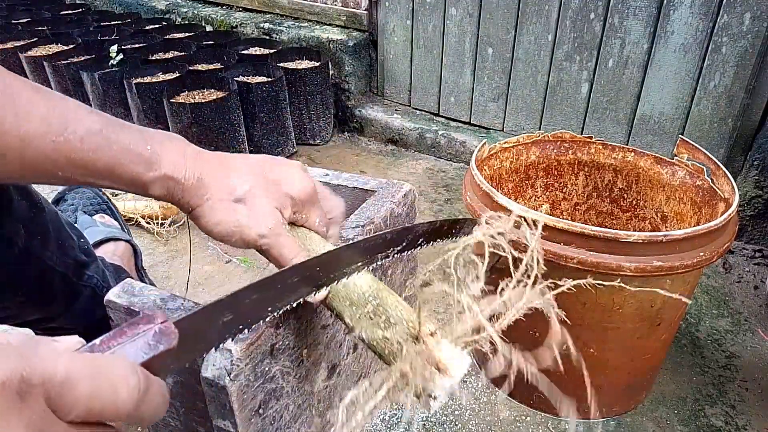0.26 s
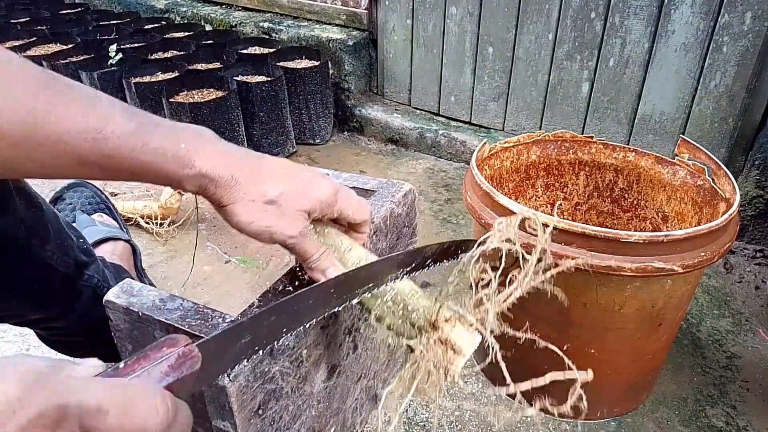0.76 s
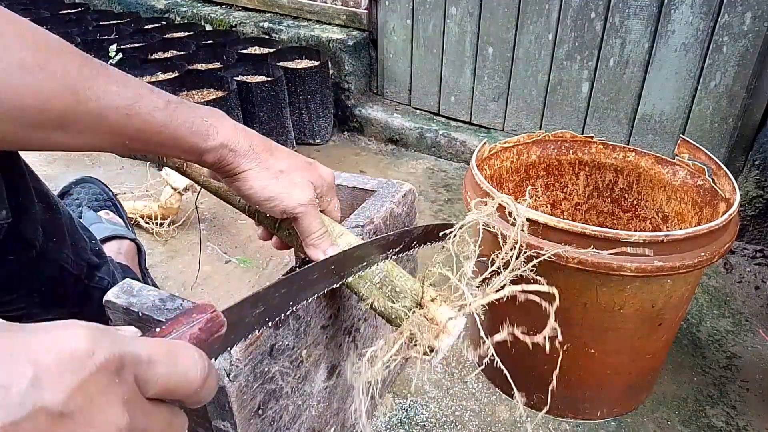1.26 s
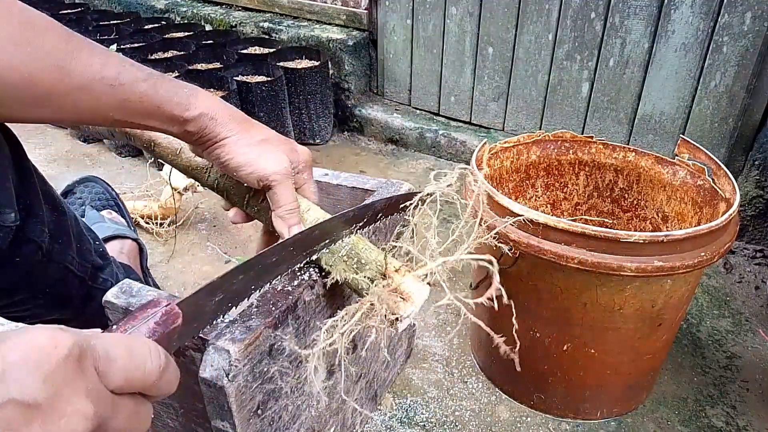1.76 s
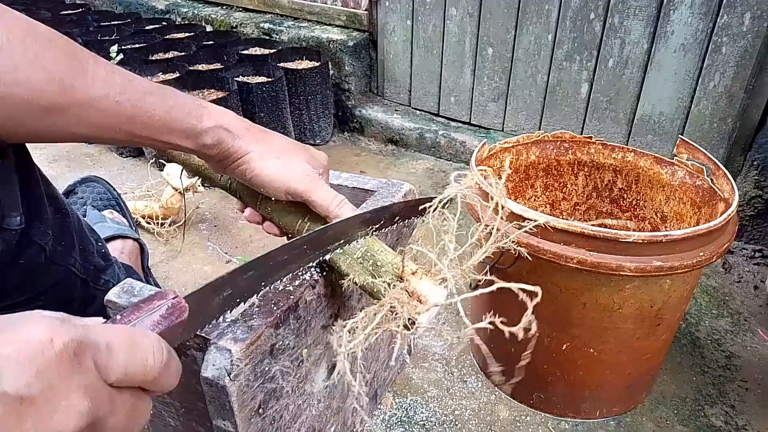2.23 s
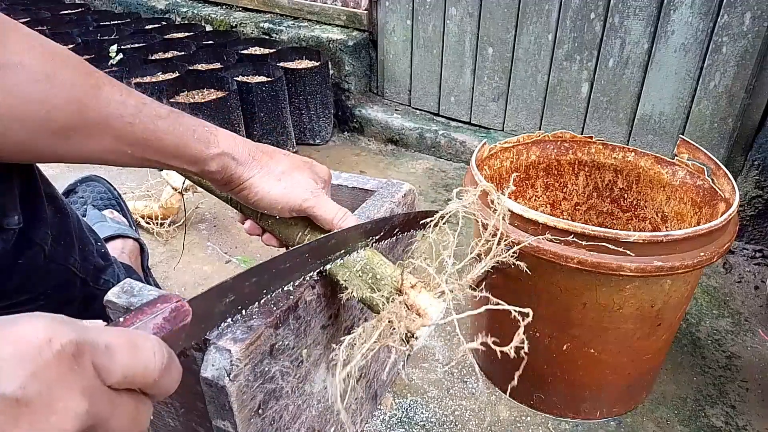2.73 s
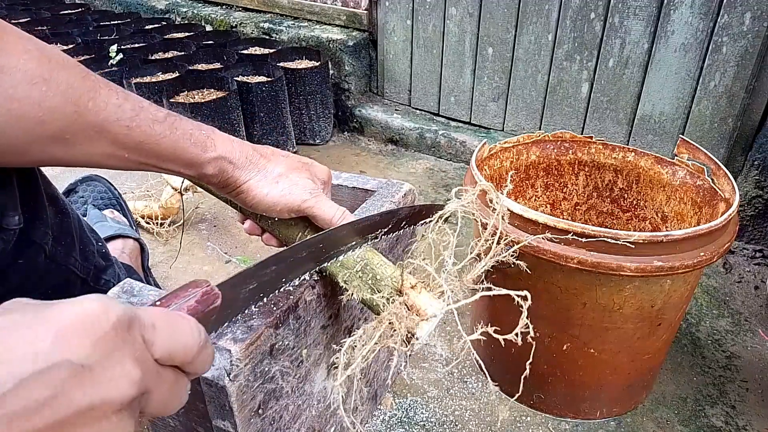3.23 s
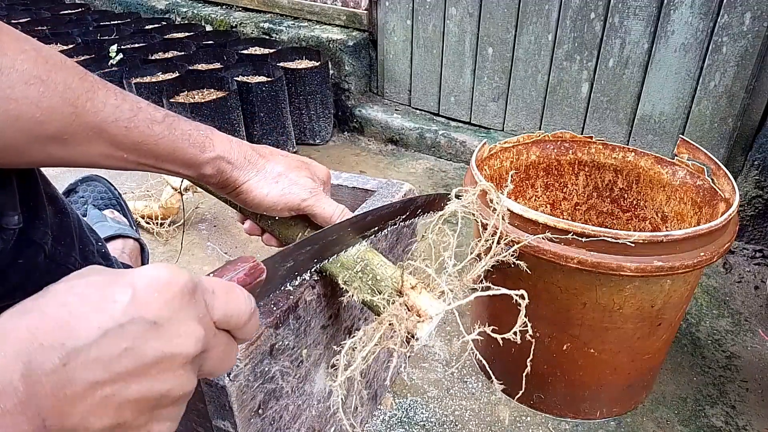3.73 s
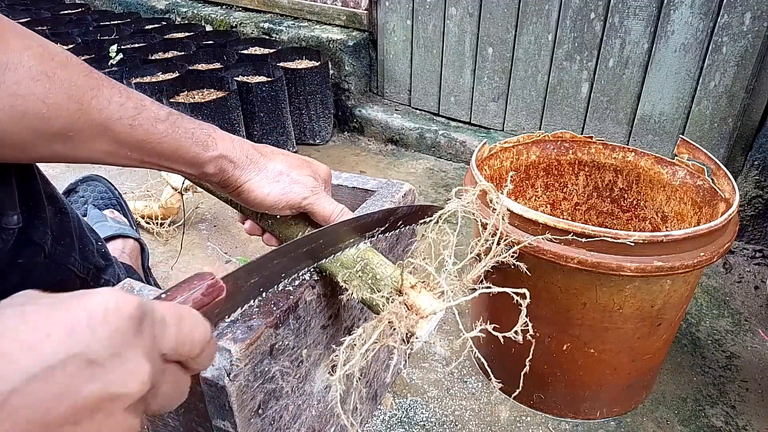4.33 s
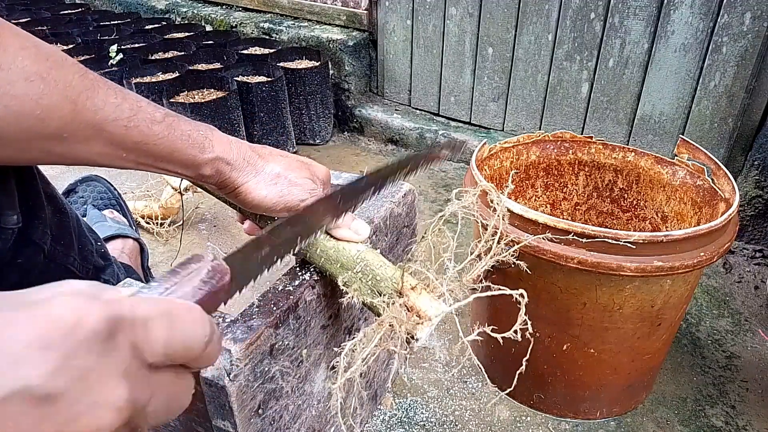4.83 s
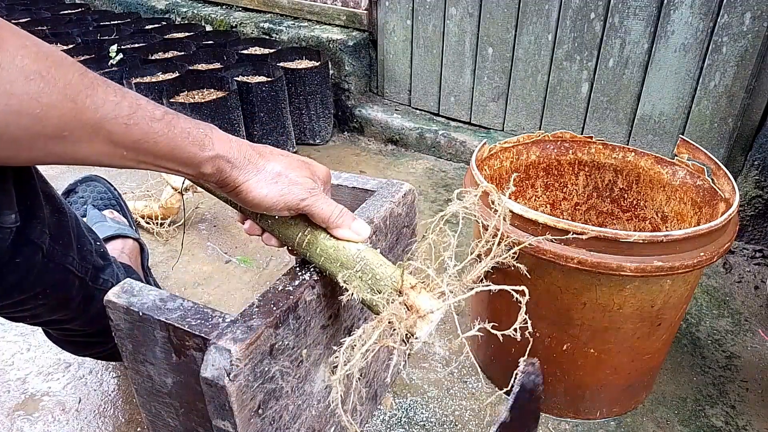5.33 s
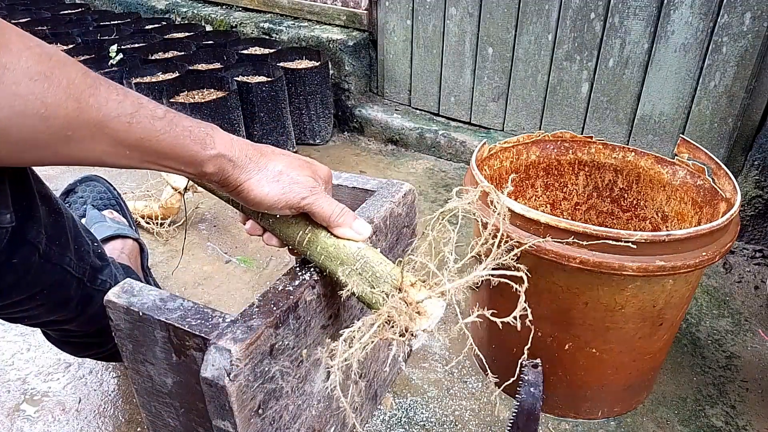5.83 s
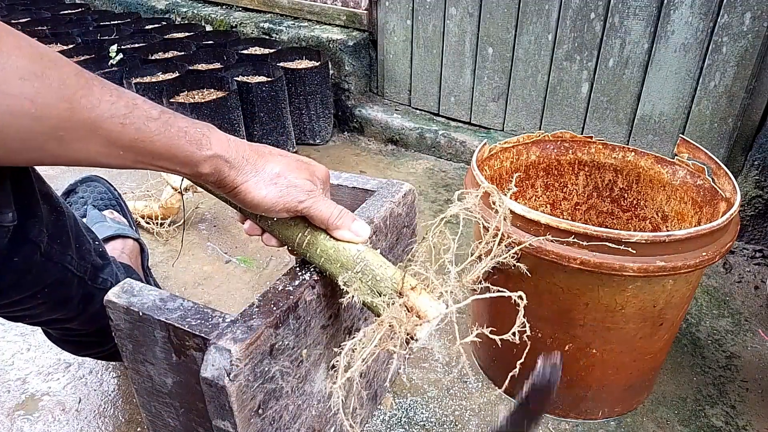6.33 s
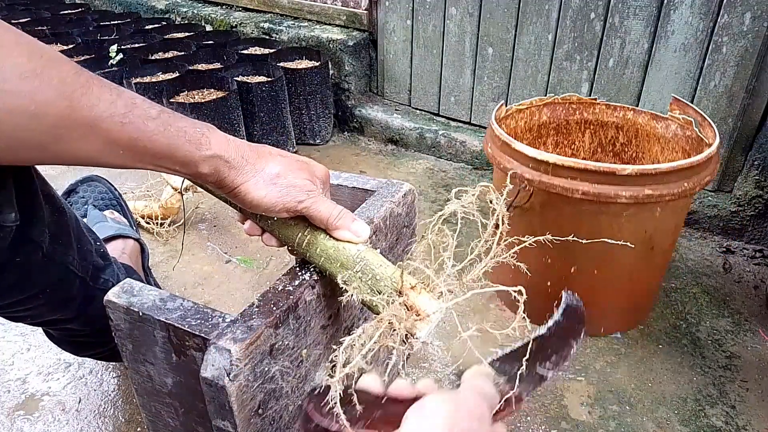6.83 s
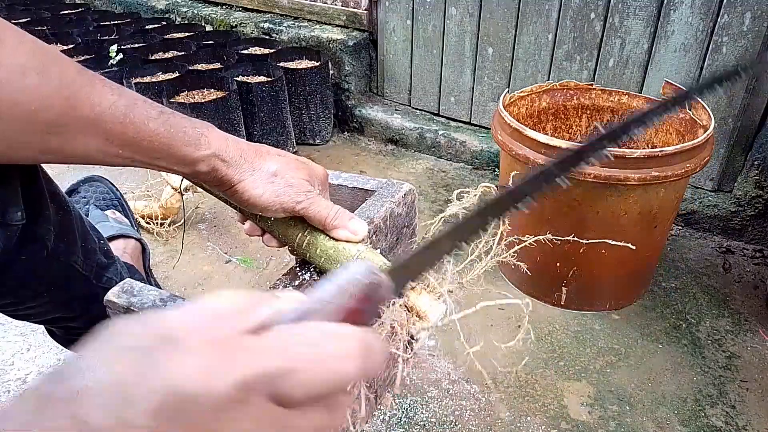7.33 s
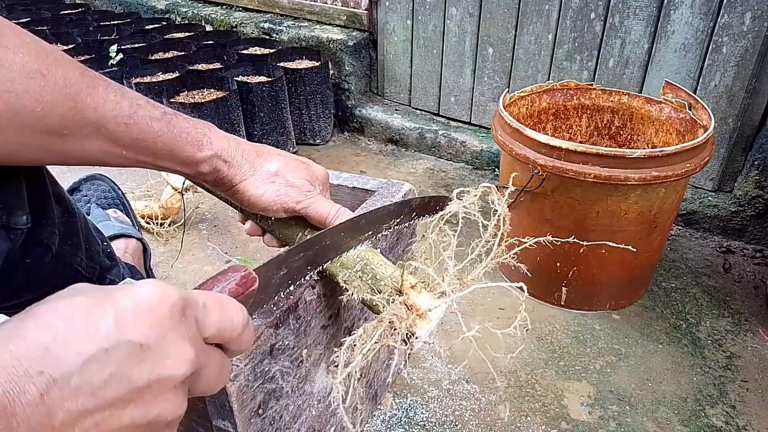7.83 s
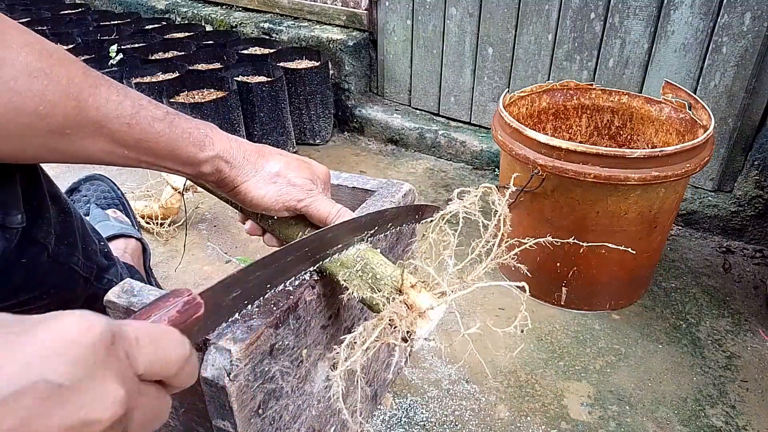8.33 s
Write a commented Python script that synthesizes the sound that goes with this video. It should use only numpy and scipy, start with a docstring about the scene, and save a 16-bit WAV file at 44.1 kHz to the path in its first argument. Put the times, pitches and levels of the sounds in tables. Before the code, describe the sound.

In a quiet outdoor yard with gliding bird whistles and a steady high insect trill, a stem rubs softly on a wooden crate and a curved saw rasps its bark in a few light strokes with small ticks. The saw is set down with a hard clack, a plastic bucket judders loudly over gritty concrete, and brief sawing resumes. Close microphone, faint reflections from a fence.

```python
"""Rubs of a green stem on a wooden crate, then a curved pruning saw rasps its bark in a few light strokes.
The saw is put down with a clack; a plastic bucket is shoved over gritty concrete; the sawing resumes.
Throughout: yard murmur, a steady insect trill and gliding bird notes; small ticks fall between.
Contacts are noise grains and bursts through spectra and resonances; birds are swept sines.
Table levels come before each source's trims, filters and echoes."""
import sys
import numpy as np
from scipy import signal
from scipy.io import wavfile
from scipy.ndimage import map_coordinates

SR = 44100
rng = np.random.default_rng(int(sys.argv[2]) if len(sys.argv) > 2 else 0)


def generate_wav(signal):
    """Clip the signal to [-1, 1] and save it as 16-bit WAV at the path in sys.argv[1]."""
    frames = np.transpose(np.atleast_2d(signal))
    scaled = np.clip(frames, -1, 1) * 32767
    pcm = np.round(scaled).astype(np.int16)
    wavfile.write(sys.argv[1], SR, pcm)


N = 377937
TIME = np.arange(N) / SR


def gain_of(db):
    """Decibels to amplitude."""
    return 10 ** (np.asarray(db) / 20)


def evened(x):
    """Scales to an rms of one."""
    return x / np.sqrt(np.mean(x ** 2) + 1e-20)


def peaked(x):
    """Scales to a peak of one."""
    return x / abs(x).max()


def add(mix, start_s, sound):
    """Mixes a sound in at a time, cut off at the end of the mix."""
    part = mix[round(start_s * SR):][:len(sound)]
    part += sound[:len(part)]


def through(x, response):
    """Passes a signal through an impulse response."""
    return signal.oaconvolve(x, response)[:len(x)]


def click(points, size=4096):
    """Minimum-phase impulse response of a spectrum given as (f/Hz, level/dB)."""
    hz, db = np.transpose(points)
    f = abs(np.fft.fftfreq(size, 1 / SR))
    level_db = np.interp(np.log(f + 1), np.log(hz), db)
    log_gain = np.log(gain_of(level_db))
    spectrum = np.exp(signal.hilbert(log_gain).conj())
    return np.fft.ifft(spectrum).real[:size // 2]


def ring(peaks, softness_hz=5500):
    """Impulse response of resonances (f/Hz, width/Hz, level/dB), excited by a slightly soft contact."""
    t = TIME[:SR // 4]
    modes = np.zeros(len(t))
    for hz, width_hz, db in peaks:
        decay = np.exp(-np.pi * width_hz * t)
        modes += gain_of(db) * width_hz * decay * np.cos(2 * np.pi * hz * t)
    soft = signal.butter(3, min(softness_hz, SR / 4), fs=SR, output="sos")
    return signal.sosfilt(soft, modes)


def crack(points, t60_s, rattle, rim_hz=2300, rim_share=0.33):
    """A contact that rings the edge for a few cycles, plus a dense, quickly dying rattle; peak one."""
    t = TIME[:SR // 5]
    blow = rng.standard_normal(len(t)) * gain_of(-60 * t / t60_s)
    blow *= rattle / np.linalg.norm(blow)
    rim = np.exp(-t / .0016) * np.sin(2 * np.pi * rim_hz * t)
    blow += rim_share * rim / np.linalg.norm(rim)
    blow[0] += .55  # first contact
    return peaked(through(blow, click(points)))


def wander(per_s):
    """Smooth chance with an rms of one."""
    knots = rng.standard_normal(4096)
    return evened(map_coordinates(knots, [TIME * per_s], order=3, mode="wrap"))


def grains(per_s, spread_db):
    """Tiny fractures at random moments, a few much larger than the rest."""
    sizes = gain_of(spread_db * np.minimum(rng.exponential(1, N), 4))
    signs = rng.choice([-1, 1], N)
    falls = rng.random(N) < per_s / SR
    return evened(sizes * signs * falls)


def echoes(x, t60_s):
    """Scattered reflections that die away, their treble softened."""
    t = TIME[:SR]
    falls = (rng.random(SR) < 2000 / SR) * (t > .006)
    taps = rng.standard_normal(SR) * falls * gain_of(-60 * t / t60_s)
    taps = signal.lfilter([1], [1, -.4], taps)
    return through(x, taps / np.linalg.norm(taps))


def resonate(x, hz, width_hz):
    """A resonance of gain one whose centre follows the curve hz."""
    turn = np.exp(2j * np.pi * np.cumsum(hz) / SR)
    r = np.exp(-np.pi * width_hz / SR)
    base = signal.lfilter([1 - r], [1, -r], x / turn + 1e-18)
    return 2 * (turn * base).real


def travelling(x, per_s, t60_s, count=4):
    """A moving contact point: it excites one dense set of plate modes after another."""
    t, out = TIME[:SR // 10], np.zeros(N)
    for k in range(count):
        modes = rng.standard_normal(len(t)) * gain_of(-60 * t / t60_s)
        distance = abs((TIME * per_s + k) % count - count / 2)
        nearness = np.cos(np.pi / 2 * np.minimum(distance, 1))
        out += nearness * evened(through(x, modes))
    return evened(out)


def low_cut(x, hz):
    """Small bodies radiate little below their lowest mode."""
    return signal.sosfilt(signal.butter(5, hz, "high", fs=SR, output="sos"), x)


BITE_CURVE = 1.6  # >1: the swell rises ever more slowly


def push(start_s, length_s, db, swell_db, attack_s, t60_s):
    """Gain of one push: a quick attack, a swell that levels off at db, and a release."""
    t = np.maximum(TIME - start_s, 0)
    still_to_rise = np.maximum(1 - t / length_s, 0) ** BITE_CURVE
    release_db = 60 * np.maximum(t - length_s, 0) / t60_s
    return np.minimum(t / attack_s, 1) * gain_of(db - swell_db * still_to_rise - release_db)


def bell(middle_s, half_length_s):
    """Gain that swells and fades evenly around a moment."""
    return np.exp(-((TIME - middle_s) / half_length_s) ** 2)


# murmur spectrum: f/Hz, level/dB
YARD_SPECTRUM = [(15, -46), (25, -18.5), (75, -1.5), (115, -1.5), (155, -17.5), (218, -2), (344, -0.5),
                 (518, -7.5), (567, -8.5), (1290, -11), (2380, -10.5), (2550, -9.5), (3210, -15),
                 (3850, -14.5), (5800, -30.5), (7540, -67), (12800, -120)]
# murmur level curve: t/s, level/dB
YARD_LEVEL = [(0, -60), (1.7, -65), (3.6, -65), (4.2, -60), (8.57, -61.5)]


def yard(air_db=2.5):
    """Distant outdoor murmur of air and traffic: shaped noise with a slowly wandering level."""
    air = evened(through(rng.standard_normal(N), click(YARD_SPECTRUM, size=16384)))
    level_db = np.interp(TIME, *np.transpose(YARD_LEVEL))
    swell_db = .4 * wander(7)
    return air * gain_of(air_db + level_db + swell_db)


# insect spectrum: f/Hz, level/dB
INSECT_SPECTRUM = [(5800, -21.5), (6550, -7), (7000, -4), (7400, -1), (7800, -19.5), (8400, -18.5),
                   (9100, -12), (10300, -20.5), (11500, -33.5), (12600, -31), (14600, -18.5), (15600, -18)]


def insects(insect_db=-65, pulses_per_s=77.8):
    """A steady high trill of throbbing noise, its pulses grouped in fours."""
    turns = pulses_per_s * TIME + .1 * wander(3)
    throb = 1 + .24 * np.sin(2 * np.pi * turns) + .2 * np.sin(np.pi * turns / 2)
    hiss = evened(through(rng.standard_normal(N), click(INSECT_SPECTRUM)))
    return gain_of(insect_db) * throb * hiss


def note(length, hz, glide, db, arch, flutter):
    """One bird note: a slightly arched glide with a fluttering pitch; shares of hz, length in s."""
    u = np.linspace(-1, 1, round(length * SR))
    knots = rng.standard_normal(512)
    shake = evened(map_coordinates(knots, [TIME[:len(u)] * 600], order=3, mode="wrap"))
    pitch_hz = hz * (1 + glide * u / 2 - arch * u ** 2) * (1 + flutter * shake)
    envelope = np.sqrt(2 * (1 - u ** 2))
    return gain_of(db) * envelope * np.sin(2 * np.pi * np.cumsum(pitch_hz) / SR)


# clear whistles: t/s, length/s, f/Hz, glide [share of f], arch [share of f], level/dB
WHISTLE_NOTES = [(.023, 0.061, 3380, -0.046, -0.011, -57), (0.151, .13, 2860, -0.11, 0.014, -56),
                 (.294, 0.062, 3150, -.05, -0.034, -54.5), (1.052, 0.087, 2830, -0.11, 0.0035, -59),
                 (1.183, 0.078, 2960, 0.026, -0.0056, -55), (1.69, 0.091, 3440, -.04, 0.0089, -68),
                 (2.927, 0.17, 5490, -.06, -.04, -61), (3.335, .12, 5065, -0.0089, 0.15, -55),
                 (3.575, .068, 5370, 0.106, 0.046, -53.5), (7.53, 0.044, 3120, -0.031, -.02, -61),
                 (7.639, 0.16, 3050, -0.084, 0.015, -60)]
# hoarse, sinking calls: t/s, length/s, f/Hz, level/dB
BUZZ_NOTES = [(.434, .12, 4120, -63), (0.704, 0.077, 4200, -66), (.929, .045, 3440, -60.5),
              (1.379, 0.078, 3980, -62), (1.582, .07, 3960, -60.5), (2.036, 0.067, 3700, -64),
              (2.181, .32, 2550, -64), (6.05, 0.31, 2840, -63.5), (7.233, 0.15, 3860, -66)]
# one bird's repeated rising chip: t/s, level/dB
CHIP_TIMES = [(2.099, -52.5), (5.04, -55.5), (5.298, -54), (5.653, -53.5), (6.269, -53.5)]
# shape of that chip: length/s, f/Hz, glide, arch, flutter [shares of f]
CHIP_SHAPE = dict(length=0.0476, hz=2430, glide=0.092, arch=0.032, flutter=0.045)
# runs of quick, high notes: t/s, length/s, notes per s, f/Hz, glide [share of f], level/dB
TRILL_RUNS = [(2.654, .26, 13.4, 5710, -.14, -61), (3.765, .53, 16, 7570, 0.028, -60)]
# shares of f
WHISTLE_FLUTTER, BUZZ_GLIDE, BUZZ_FLUTTER = 0.015, -0.0403, 0.0436
TRILL_NOTE_S, TRILL_ARCH, TRILL_FLUTTER = 0.04, 0.031, 0.028


def birds(direct=0.75, echo=0.61, t60_s=0.44):
    """Thin gliding whistles, some pure and some buzzy, blurred by echoes from walls and trees."""
    out = np.zeros(N)
    for s, length_s, hz, glide, arch, db in WHISTLE_NOTES:
        add(out, s, note(length_s, hz, glide, db, arch, WHISTLE_FLUTTER))
    for s, length_s, hz, db in BUZZ_NOTES:
        add(out, s, note(length_s, hz, BUZZ_GLIDE, db, 0, BUZZ_FLUTTER))
    for s, db in CHIP_TIMES:
        add(out, s, note(db=db, **CHIP_SHAPE))
    for start_s, length_s, per_s, hz, glide, db in TRILL_RUNS:
        for s in np.arange(start_s, start_s + length_s, 1 / per_s):
            add(out, s, note(TRILL_NOTE_S, hz, glide, db, TRILL_ARCH, TRILL_FLUTTER))
    return direct * out + echo * echoes(out, t60_s)


# bucket jerks: t/s, length/s, grit end level/dB, swell up to it/dB, wall drone level/dB, favoured f/Hz
SLIDE_JERKS = [(6.641, 0.039, -29.5, -7.5, -26.5, 2140), (6.691, 0.077, -25.5, 6, -20.5, 1290),
               (6.791, 0.018, -31, 5, -23, 1400), (6.817, 0.1, -30.5, -10, -38, 1810),
               (6.921, 0.034, -22, 4, -29, 1295), (6.974, 0.051, -31.5, -5.5, -25, 950)]
SLIDE_ATTACK_S, SLIDE_T60_S, DRONE_T60_S = 0.018, .15, 0.23
SCRAPE_SAG_OCT_PER_S = 1.9


def sliding():
    """Jerks as three controls: friction, wall shaking, and a scraping pitch that sinks as a jerk slows."""
    friction, wall, pitch_hz = np.zeros(N), np.zeros(N), np.zeros(N)
    for s, length_s, db, swell_db, drone_db, hz in SLIDE_JERKS:
        friction += push(s, length_s, db, swell_db, SLIDE_ATTACK_S, SLIDE_T60_S)
        wall += push(s, length_s, drone_db, 0, SLIDE_ATTACK_S, DRONE_T60_S)
        sinking_hz = hz * 2 ** (-SCRAPE_SAG_OCT_PER_S * np.maximum(TIME - s, 0))
        pitch_hz = np.where(TIME < s, pitch_hz, sinking_hz)
    return friction, wall, pitch_hz


# base on grit, spectrum: f/Hz, level/dB
GRIT_SPECTRUM = [(200, -28), (350, 7), (540, -7), (900, 0.5), (1050, -7), (1350, -5.5), (2200, -8),
                 (3100, -6), (4200, -15.5), (7500, -40), (9500, -19.5), (12400, -42.5), (15300, -36.5)]
# shell resonances: f/Hz, width/Hz, level/dB
SHELL_MODES = [(938, 14, 12.5), (1285, 60, 7.5), (1704, 66, 0.5), (2167, 26, 1), (2710, 20, -22),
               (3040, 66, -23.5), (4430, 39, -28.5)]
# wall resonances: f/Hz, width/Hz, level/dB
WALL_MODES = [(274, 24, -10), (287.4, 22.3, 19), (371, 54, -23)]
# bucket struck, then catching and jumping: t/s, crack level/dB, wall boom level/dB
BUCKET_JOLTS = [(6.6445, -3.5, -48), (6.654, -17.5, -33), (6.7025, -28, -21), (6.7115, -34, -12),
                (6.714, -38, -9.5), (6.747, -22, -17), (6.756, -25, -27), (6.8236, -10.5, -38),
                (6.835, -27, -31), (6.889, -23, -13), (6.927, -23, -43), (6.954, -26, -33)]
# jolt spectrum: f/Hz, level/dB
JOLT_SPECTRUM = [(150, -9), (260, -5.5), (600, -12), (900, -9.5), (1400, -11), (2200, -1.5), (2700, -5.5),
                 (3280, -4.5), (3900, -18), (6000, -21), (7700, -31), (9600, -31.5), (12500, -49.5),
                 (15500, -32.5)]


def bucket(grit_db=-3, shell_db=-6, scrape_db=-7, drone_db=-4, lowest_hz=245, thud_db=-12):
    """The base judders over grit and shakes the shell; jolts crack and make the wall boom."""
    slips = grains(3000, 3) * np.exp(.25 * wander(160))
    shaking = travelling(slips, per_s=22, t60_s=.018)
    grit = evened(through(shaking, click(GRIT_SPECTRUM)))
    friction, wall, pitch_hz = sliding()
    scrape = evened(resonate(grit, pitch_hz, width_hz=360))
    shell = evened(through(slips, ring(SHELL_MODES)))
    drone = evened(through(slips, ring(WALL_MODES)))
    rough = gain_of(grit_db) * grit + gain_of(shell_db) * shell + gain_of(scrape_db) * scrape
    out = friction * rough + wall * gain_of(drone_db) * drone
    soft_push = signal.windows.hann(SR // 400)
    boom = peaked(through(ring(WALL_MODES), soft_push))
    for s, crack_db, boom_db in BUCKET_JOLTS:
        add(out, s, gain_of(crack_db) * crack(JOLT_SPECTRUM, t60_s=0.06, rattle=0.85, rim_hz=2025))
        add(out, s, gain_of(boom_db) * boom)
    return low_cut(out, lowest_hz) + gain_of(thud_db) * out  # uncut share keeps a thud


# saw landing, blade then handle: t/s, crack level/dB, ring level/dB
SAW_CLACKS = [(5.419, -9, -31), (5.437, -18, -27), (5.4394, -15.5, -13.5)]
# clack spectrum: f/Hz, level/dB
CLACK_SPECTRUM = [(130, -21), (250, -3), (500, -14), (800, 3), (1100, -6), (1500, -1.5), (2200, 1.5),
                  (3400, -7.5), (4000, -15), (4900, -15), (6100, -27), (10000, -35), (12600, -54),
                  (15000, -43)]
# handle and blade modes: f/Hz, level/dB, t60/s
HANDLE_MODES = [(637, -7, 0.17), (841, -5.5, 0.19), (946, 1.5, 0.089), (994, 4.5, 0.12), (1240, -6.5, 0.12),
                (1603, -6.5, 0.1), (1980, -15, 0.096), (2160, -15, .1), (3460, 0.5, 0.051),
                (4480, -14, 0.053)]


def saw_put_down(lowest_hz=185):
    """Quick contacts, each a crack plus decaying handle and blade modes; the last rings most."""
    out, t = np.zeros(N), TIME[:SR // 3]
    modes = np.zeros(len(t))
    for hz, db, t60_s in HANDLE_MODES:
        modes += gain_of(db - 60 * t / t60_s) * np.sin(2 * np.pi * hz * t)
    modes = peaked(modes)
    for s, crack_db, ring_db in SAW_CLACKS:
        clack = crack(CLACK_SPECTRUM, t60_s=0.081, rattle=0.94, rim_hz=2400, rim_share=0.16)
        add(out, s, gain_of(crack_db) * clack)
        add(out, s, gain_of(ring_db) * modes)
    return low_cut(out, lowest_hz)


# ticks of bark, teeth and roots: t/s, peak level/dB, dull knock relative to that peak/dB
SNAPS = [(0.639, -36, 0.5), (1.612, -39, 0.5), (1.684, -45, -5), (1.82, -47, -12), (2.919, -43.5, -25),
         (4.198, -33, -15), (4.41, -31.5, 0), (4.666, -40.5, 1), (5.909, -38.5, 5), (6.038, -40.5, 7),
         (7.174, -45, 10), (8.477, -29.5, -6.5), (8.503, -35.5, 4)]
# tick spectrum: f/Hz, level/dB
TICK_SPECTRUM = [(200, -38), (900, -13), (2500, 10.5), (4000, -0.5), (6000, -14), (10000, -9.5),
                 (15000, -44.5)]
# wood knock modes: f/Hz, width/Hz, level/dB
KNOCK_MODES = [(121, 13, -4.5), (283, 30, 7.5), (890, 110, 1), (1280, 55, 2)]
# faint snaps while the hand shifts its grip: earliest t/s, latest t/s
FIDGET_SPAN_S = (1.2, 1.65)
FIDGET_DB, FIDGET_SPREAD_DB = -50, 1.5


def ticks(tick_db=-2, faint_knock_db=-12, count=4):
    """Small snaps, each with a knock of the wood below; a few faint ones fall at random."""
    out, knock = np.zeros(N), peaked(ring(KNOCK_MODES))
    snaps = list(SNAPS)
    for _ in range(count):
        s = rng.uniform(*FIDGET_SPAN_S)
        snaps.append((s, FIDGET_DB + FIDGET_SPREAD_DB * rng.standard_normal(), faint_knock_db))
    for s, db, knock_db in snaps:
        add(out, s, gain_of(db) * crack(TICK_SPECTRUM, t60_s=0.1, rattle=6.5, rim_hz=2930))
        add(out, s, gain_of(db + knock_db) * knock)
    return gain_of(tick_db) * out


# stem rubbing under the hand and on the crate: middle t/s, half length/s, rub level/dB, boom level/dB
STEM_RUBS = [(.25, 0.41, -66.5, -58.5), (2.252, 0.19, -71, -63.5), (3.873, 0.11, -53, -48.5),
             (4.025, 0.16, -82, -57.5), (4.204, 0.064, -51.5, -70), (8.306, 0.056, -61, -61),
             (8.512, 0.041, -59.5, -49)]
# rub spectrum: f/Hz, level/dB
RUB_SPECTRUM = [(260, -45), (450, -31), (789, 6.5), (1330, 2.5), (2090, -8), (2810, -5.5), (4490, -15),
                (9750, -17.5), (11000, -20), (14300, -72), (22000, -120)]
# hollow crate resonances: f/Hz, width/Hz, level/dB
CRATE_MODES = [(262, 35, 2), (312, 30, 4), (470, 64, -14.5)]


def rubbing(rub_db=5.0, boom_db=-1):
    """Soft, dull friction that also stirs the hollow crate."""
    slips = grains(6000, 2.5) * np.exp(0.23 * wander(70))
    rub_gain = sum(gain_of(db) * bell(s, half_s) for s, half_s, db, _ in STEM_RUBS)
    boom_gain = sum(gain_of(db) * bell(s, half_s) for s, half_s, _, db in STEM_RUBS)
    rub = rub_gain * evened(through(slips, click(RUB_SPECTRUM)))
    boom = boom_gain * evened(through(slips, ring(CRATE_MODES)))
    return gain_of(rub_db) * rub + gain_of(boom_db) * boom


# saw strokes: t/s, length/s, rasp level at full bite/dB, swell up to it/dB
SAW_STROKES = [(3.13, .5, -57.5, 0), (3.737, 0.15, -56.5, 7), (4.047, 0.5, -39, 26.5),
               (4.65, 0.11, -39.5, 10), (8.14, .175, -47, 8), (8.418, .1, -40, 11.5)]
# tearing bark spectrum: f/Hz, level/dB
RASP_SPECTRUM = [(45, -45), (105, 8.5), (167, -23), (260, 2.5), (520, -11.5), (700, -13.5), (1700, -10.5),
                 (2800, -0.5), (3760, -9.5), (6100, -16), (8000, -22.5), (9400, -13), (12400, -28),
                 (15300, -20)]
# blade resonances: f/Hz, width/Hz, level/dB
BLADE_MODES = [(2282, 32, 2), (2830, 35, 6), (3160, 42, 1.5), (3450, 28, 4), (3735, 45, 5.5),
               (4000, 120, 0), (4400, 47, -5.5), (4770, 62, -3.5), (5340, 110, -6.5)]
STROKE_ATTACK_S, STROKE_T60_S = .018, .2  # the teeth catch, and let go


def saw(teeth_per_s=130, tear_db=-5, plate_db=-4.0, blade_db=-3.5, blade_follows=0.91,
        stem_hz=420, stem_follows=1.3):
    """Teeth tear fibres; the blade rings most freely in light strokes; a deep bite shakes the stem."""
    force = sum(push(*stroke, STROKE_ATTACK_S, STROKE_T60_S) for stroke in SAW_STROKES)
    effort = force / force.max()
    speed = effort ** 0.32 * np.exp(.25 * wander(45))
    tooth_phase = np.cumsum(teeth_per_s * speed) / SR % 1
    tooth_bite = .5 + .5 * np.exp(-tooth_phase / .4)
    chatter = np.exp(.19 * np.sin(2 * np.pi * 41 * TIME) + .13 * wander(110))
    fibres = grains(5000, 2.5) * tooth_bite * chatter
    tear = evened(through(fibres, click(RASP_SPECTRUM)))
    stem = signal.sosfiltfilt(signal.butter(2, stem_hz, fs=SR, output="sos"), tear)
    bright = tear - stem
    plate = travelling(bright, per_s=9, t60_s=.035)
    tear = bright + effort ** stem_follows * stem
    blade = evened(through(fibres, ring(BLADE_MODES)))
    ringing = gain_of(plate_db) * plate + gain_of(blade_db) * blade
    return force.max() * (effort * gain_of(tear_db) * tear + effort ** blade_follows * ringing)


def scene(wall_db=-20):
    """The yard behind, the work close by, and a faint slap from the fence."""
    near = bucket() + saw_put_down() + ticks() + rubbing() + saw()
    slap = gain_of(wall_db) * echoes(near, t60_s=0.23)
    return (yard() + insects() + birds() + slap + near)[None]


EDGE_HZ = 15600


def record(dry):
    """Band limit: a steep linear-phase low-pass at EDGE_HZ."""
    low_pass = signal.firwin(511, EDGE_HZ, window=("kaiser", 9), fs=SR)
    return signal.oaconvolve(dry, low_pass[None], "same")


dry = scene()
out = record(dry)
generate_wav(out)
```